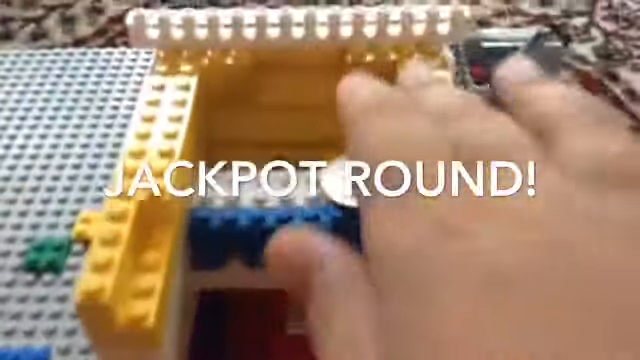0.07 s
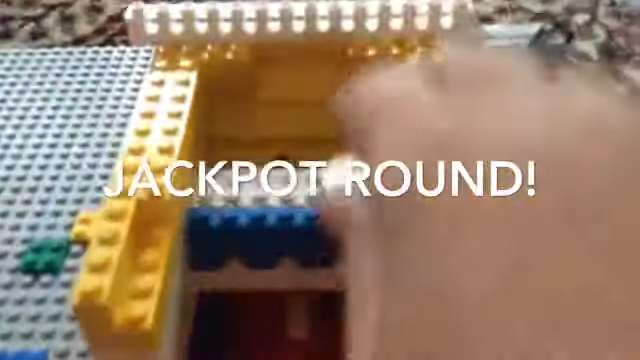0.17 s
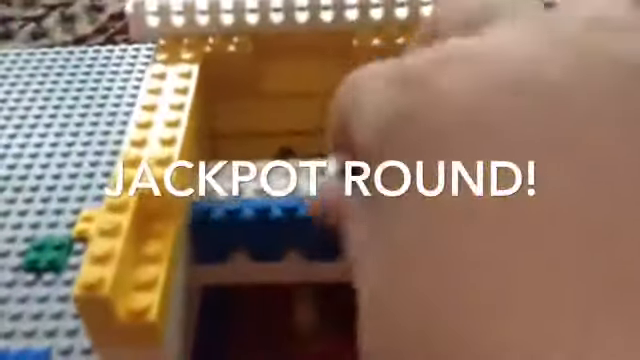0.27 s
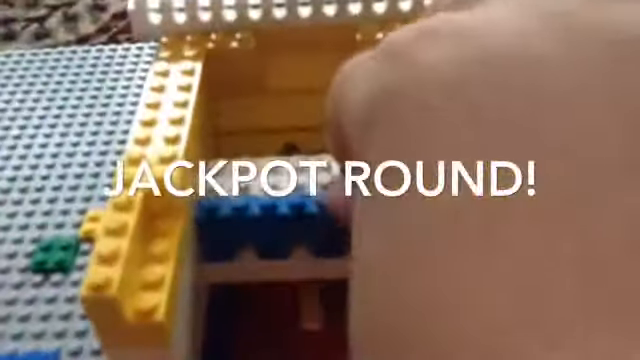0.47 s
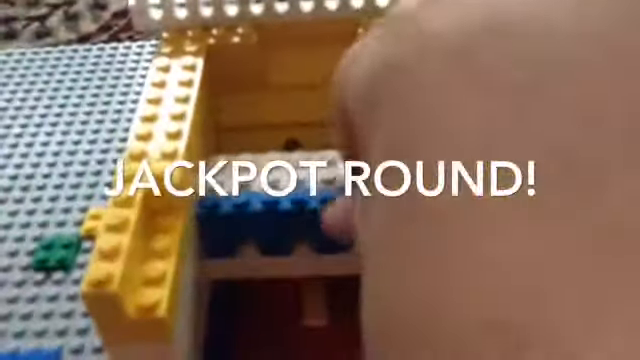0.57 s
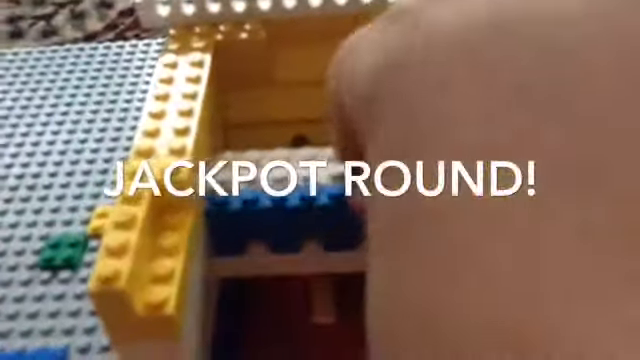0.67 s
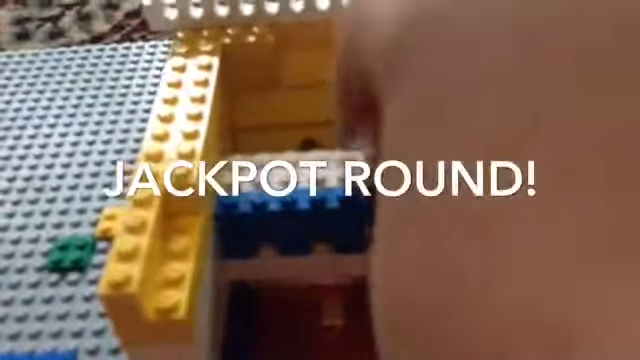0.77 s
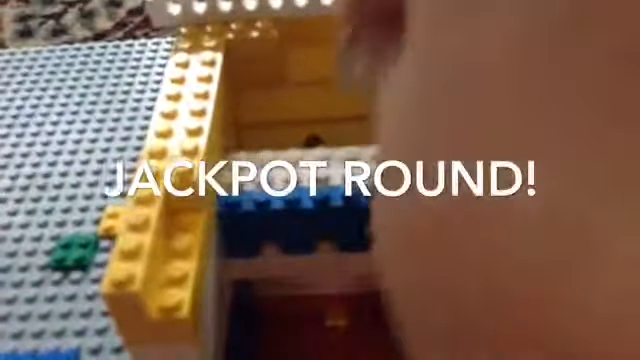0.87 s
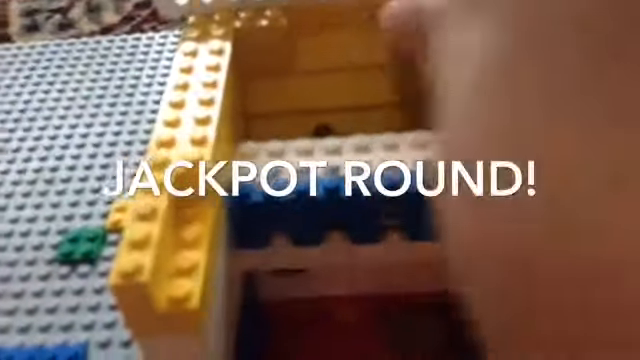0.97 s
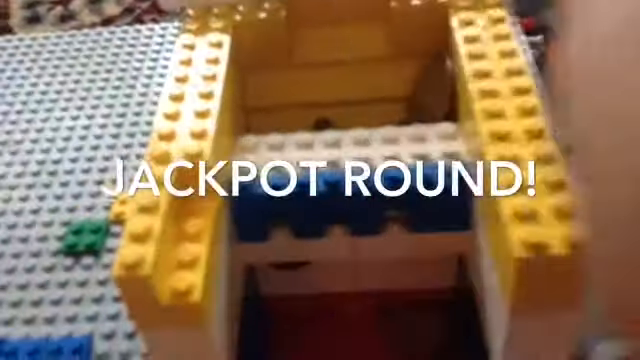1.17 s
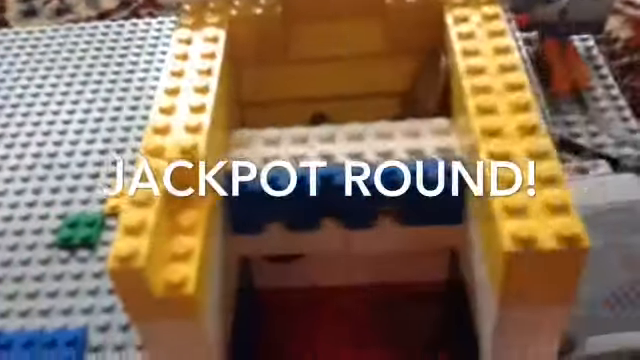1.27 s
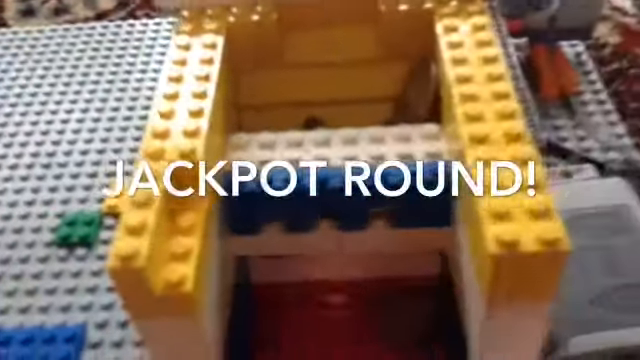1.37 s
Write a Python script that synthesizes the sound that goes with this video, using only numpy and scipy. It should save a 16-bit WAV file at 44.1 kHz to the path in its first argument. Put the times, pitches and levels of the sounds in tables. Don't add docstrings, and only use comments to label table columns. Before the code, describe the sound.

Coins clatter in a hollow plastic brick toy. Faint motor whine, gear chatter and hiss run throughout. At about 0.24 s a coin lands with a hard clack and very high ring, rattling in shrinking bounces until 0.52. Soft hollow knocks come from 0.57 to 1.0, strongest near 0.66 and 0.77. At 1.06 a second coin clacks with a low thump, bounces until 1.15 and ticks at 1.21. Close, dry room.

```python
import sys
import numpy as np
from scipy import signal
from scipy.io import wavfile
from scipy.ndimage import uniform_filter1d

SR = 44100
rng = np.random.default_rng(int(sys.argv[2]) if len(sys.argv) > 2 else 0)


def makeup_ratio(level_db):
    decades = np.asarray(level_db, float) / 20
    return 10 ** decades


def wav_record(signal):
    frames = np.transpose(np.atleast_2d(signal))
    bounded = np.clip(frames, -1, 1)
    quanta = np.round(bounded * 32767).astype(np.int16)
    wavfile.write(sys.argv[1], SR, quanta)


N = 61739
BAND_EDGE_HZ = 15300

# (frequency [Hz], level [dB])
TRAY_WALLS = [(1500, 0), (2100, 2.5), (2900, -2.5), (3750, -6), (4550, -1), (5150, -11.5), (5900, -7),
              (7200, -21)]
# (frequency [Hz], level [dB])
FIRST_RIM = [(7500, -1), (8600, 1.5), (9500, -0.5), (11500, -6), (12700, 0), (14000, -10), (14800, -2.5),
             (15600, -15)]


def evened(x):
    return x / np.sqrt(np.mean(x ** 2) + 1e-20)


def add(mix, start_s, sound):
    part = mix[round(start_s * SR):][:len(sound)]
    part += sound[:len(part)]


def ring(x, hz, width_hz):
    r = np.exp(-np.pi * width_hz / SR)
    feedback = [1, -2 * r * np.cos(2 * np.pi * hz / SR), r * r]
    return signal.lfilter([(1 - r * r) / 2, 0, (r * r - 1) / 2], feedback, x)


def struck(modes, detune, rise_s, size, spread=0.23):
    t = np.arange(size) / SR
    out = np.zeros(size)
    for hz, db, t60 in modes:
        pitch, phase = rng.random(2)
        turns = hz * (1 + detune * (2 * pitch - 1)) * t + spread * phase
        out += makeup_ratio(db - 60 * t / abs(t60)) * np.sin(2 * np.pi * turns)
    out = out * (1 - np.exp(-t / rise_s))
    return out / abs(out).max()


def many(outline, t60, spot_hz):
    f, db = np.transpose(outline)
    draw = rng.random((40, 3))
    hz = f[0] + (f[-1] - f[0]) * (np.arange(40) + draw[:, 0]) / 40
    level = np.interp(hz, f, db) + 8.5 * np.exp(-((hz - spot_hz) / (0.046 * hz)) ** 2)
    ring_s = t60 * makeup_ratio(0.13 * (level - level.max()) + 2.0) * (0.65 + 0.26 * draw[:, 2])
    return np.transpose([hz, level - 4 * draw[:, 1], ring_s])


def contacts(touches, walls, rim, box, box_rise_s):
    wall_t60, rim_t60, rise_s = 0.014, 0.013, 0.00053
    out = np.zeros(N)
    for s, wall_db, box_db, tick_db, spot_hz in touches:
        wall_modes = many(walls, wall_t60 * max(1 + 0.01 * wall_db, .4), spot_hz)
        tilt_db_per_octave = 0.28 * (tick_db - wall_db + 18.5)
        wall_modes[:, 1] += tilt_db_per_octave * np.log2(wall_modes[:, 0] / 3000)
        clack = makeup_ratio(wall_db) * struck(wall_modes, 0, rise_s, size=2500)
        knock = makeup_ratio(box_db) * struck(box, 0.031, box_rise_s, size=2500)
        tick = makeup_ratio(tick_db) * struck(many(rim, rim_t60, spot_hz), 0, rise_s, size=2500)
        add(out, s, clack + knock + tick)
    return signal.sosfilt(signal.butter(3, 480, "high", fs=SR, output="sos"), out)


def room(x):
    level_db, t60 = -19, 0.025
    t = np.arange(8000) / SR
    dull_noise = signal.lfilter([1], [1, -.5], rng.standard_normal(len(t)))
    tail = dull_noise * makeup_ratio(-60 * t / t60) * (t > .003)
    return makeup_ratio(level_db) * signal.fftconvolve(x, tail / np.linalg.norm(tail))[:N]


def patchy_hiss():
    # (frequency [Hz], density [dB per Hz])
    hiss_colour = [(60, -65), (130, -19), (220, -12.5), (450, -13.5), (800, -7), (3000, -5), (8000, -13),
                   (15000, -10.5)]
    frames, bins = N // 128 + 6, np.fft.rfftfreq(512, 1 / SR)
    real, imag, patches = rng.standard_normal((3, 257, frames))
    patches = uniform_filter1d(patches, size=6, axis=1)
    patches = evened(uniform_filter1d(patches, size=16, axis=0))
    f, db = np.transpose(hiss_colour)
    colour_db = np.interp(np.log(bins + 1), np.log(f + 1), db)[:, None]
    patch_db = 3 * patches * np.clip(bins / 900, .3, 1)[:, None]
    spectrum = (real + 1j * imag) * makeup_ratio(colour_db + patch_db)
    return evened(signal.istft(spectrum, nperseg=512, noverlap=384)[1][:N])


def gear_chatter():
    # (frequency [Hz], width [Hz], level [dB])
    casing = [(1143, 156, -3), (2200, 310, -9.5), (2830, 190, -24), (3980, 490, -7.5), (6900, 600, -8),
              (9900, 320, -8), (12900, 340, -17)]
    teeth_per_s, spread_db, whir = 930, 3.5, 0.41
    chance, force, side = rng.random((3, N))
    taps = (chance < teeth_per_s / SR) * makeup_ratio(-spread_db * np.log(force + 0.0035)) * np.sign(side - .5)
    teeth = evened(taps) + whir * rng.standard_normal(N)
    out = np.zeros(N)
    for hz, width_hz, db in casing:
        out += makeup_ratio(db) * evened(ring(ring(teeth, hz, width_hz), hz, 2 * width_hz))
    return evened(out)


def motor_whine(level_db):
    # (time [s], whine pitch [Hz])
    motor_speed = [(0.0, 853.6), (0.07, 828.1), (0.206, 852.5), (0.244, 799.5), (0.31, 847.3),
                   (0.346, 799.3), (0.376, 846.6), (0.45, 826.6), (0.498, 860.5), (0.716, 833.5),
                   (0.762, 810.2), (0.868, 834.3), (0.96, 810.6), (1.062, 864.5), (1.078, 837.4),
                   (1.222, 857.5), (1.28, 831.2), (1.4, 853.8)]
    waver_hz, flutter_db, octave_db = 5.3, 2.5, -19
    slow_noise = uniform_filter1d(rng.standard_normal(N), size=500)
    waver = evened(uniform_filter1d(slow_noise, size=500))
    hz = np.interp(np.arange(N) / SR, *np.transpose(motor_speed)) + waver_hz * waver
    turn = 2 * np.pi * np.cumsum(hz) / SR
    flutter = flutter_db * np.roll(waver, N // 3)
    return makeup_ratio(level_db + 5.5 + flutter) * (np.sin(turn) + makeup_ratio(octave_db) * np.sin(2 * turn))


def machine():
    # (time [s], whine level [dB], gear and hiss level [dB])
    motor_load = [
        (0, -46.5, -35),
        (.2, -46, -35),
        (.42, -51, -34.5),
        (.55, -50, -37.5),
        (.7, -47, -38),
        (1.0, -47.5, -37.5),
        (1.2, -50.5, -39),
        (1.27, -51.5, -39.5),
        (1.4, -50.5, -36.5),
    ]
    s, whine_db, load_db = np.transpose(motor_load)
    t = np.arange(N) / SR
    hiss = patchy_hiss()
    hum = signal.sosfiltfilt(signal.butter(2, 600, fs=SR, output="sos"), hiss)
    running_noise = makeup_ratio(-6) * gear_chatter() + hiss - hum
    whine = motor_whine(np.interp(t, s, whine_db))
    out = whine + makeup_ratio(-36.5) * hum + makeup_ratio(np.interp(t, s, load_db)) * running_noise
    return signal.oaconvolve(out, signal.firwin(511, BAND_EDGE_HZ - 100, fs=SR), "same")


def pusher():
    # (time [s], brick walls [dB], hollow box [dB], rim tick [dB], favoured wall pitch [Hz])
    knocks = [(.570, -37, -32, -38, 3000), (.637, -52, -31, -43, 2200), (.642, -54, -23, -36, 2200),
              (.659, -18.5, -23, -30, 2200), (.703, -50, -27.5, -48, 3000), (.768, -15.5, -21, -22, 3680),
              (.810, -37, -27.5, -36, 2400), (.817, -49, -28.5, -42, 2500), (.950, -27.5, -26, -35, 2200),
              (.972, -38, -32.5, -47, 2400), (1.000, -28.5, -30, -54, 2400)]
    # (frequency [Hz], level [dB], t60 [s])
    push_box = [(1030, 0.5, 0.028), (1179, 2, 0.04), (1275, -6.5, 0.042)]
    return contacts(knocks, TRAY_WALLS, FIRST_RIM, push_box, 0.0012)


def thumps():
    # (time [s], frequency [Hz], level [dB])
    jolts = [
        (0.2418, 196, -25),
        (1.062, 240, -21),
        (1.149, 270, -28.5),
        (1.262, 255, -37.5),
    ]
    out, t = np.zeros(N), np.arange(4000) / SR
    for s, hz, db in jolts:
        decay = makeup_ratio(db - 60 * t / 0.025)
        add(out, s, decay * np.sin(2 * np.pi * hz * t) * np.minimum(t / 0.0047, 1))
    return out


def flights():
    # (start [s], length [s], frequency [Hz], level [dB], t60 [s], negative swells)
    songs = [
        (.285, .048, 12862, -31, .5),
        (.346, .061, 12762, -34.5, -.8),
        (.438, .034, 12768, -42, .5),
        (1.076, .101, 9452, -41.5, 8.0),
        (1.213, .06, 9420, -49, .6),
    ]
    out = np.zeros(N)
    for s, length, hz, db, t60 in songs:
        t = np.arange(0, length, 1 / SR)
        fade = np.clip(np.minimum(t / .003, (length - t) / .004), 0, 1)
        wobble = makeup_ratio(1.2 * np.sin(2 * np.pi * 31 * t))
        add(out, s, fade * wobble * makeup_ratio(db + 2.0 - 60 * t / t60) * np.sin(2 * np.pi * hz * t))
    return out


def clinks():
    # (time [s], level [dB], favoured pitch [Hz])
    touches = [
        (0.2409, -11.5, 12900),
        (0.2462, -6.5, 12900),
        (0.253, -8, 12950),
        (0.255, -12, 13000),
        (0.2603, -8, 13300),
        (0.2647, -16, 12100),
        (0.2691, -8, 12630),
        (0.273, -19, 12300),
        (0.281, -17, 12400),
        (0.298, -30, 13000),
    ]
    # (frequency [Hz], level [dB], t60 [s])
    coin_modes = [(12630, 0, .08), (12705, -4, .05), (12765, 0, .07), (12873, -3, .05), (12988, -3, .05),
                  (13220, -9, .06), (13380, -11, .04), (13680, -10, .05), (13845, -14, .08),
                  (13980, -14, .03), (14450, -16, .08), (15150, -12, .05), (11900, -14, .04)]
    out = np.zeros(N)
    for s, db, spot_hz in touches:
        modes = np.array(coin_modes, float)
        modes[:, 1] += 6 * np.exp(-((modes[:, 0] - spot_hz) / 120) ** 2)
        add(out, s, makeup_ratio(db) * struck(modes, 0.00021, 0.000057, size=6000, spread=1))
    return out


def coin_contacts():
    # (time [s], brick walls [dB], hollow box [dB], rim tick [dB], favoured wall or rim pitch [Hz])
    first_coin = [(.2412, -1, -7, -14, 2980), (.2475, -17, -25, -22, 4700), (.252, -10, -15.5, -23, 3870),
                  (.2585, -7.5, -48, -16, 3150), (.2605, -10, -11.5, -20, 6800),
                  (.267, -19, -41, -20, 3230), (.270, -11, -37, -17.5, 3210), (.281, -15, -25, -27, 2900),
                  (.292, -20, -31, -35, 4620), (.2975, -17.5, -24.5, -26, 3430),
                  (.3015, -28, -51, -47, 3370), (.316, -18, -31, -39, 6400), (.3262, -20, -24.5, -35, 6400),
                  (.3278, -21, -20.5, -41, 2920), (.3366, -7, -24, -14, 3000),
                  (.3447, -9.5, -21, -10, 8460), (.3497, -20.5, -22, -36, 3200),
                  (.369, -50, -27.5, -56, 2820), (.386, -21.5, -47, -45, 3370),
                  (.421, -31, -21.5, -40, 3020), (.4343, -17.5, -19, -19.5, 8100),
                  (.4722, -20, -19.5, -24.5, 2980), (.4832, -15, -28, -39, 6860),
                  (.488, -24, -17, -29, 3980), (.4962, -12, -12.5, -17, 2400), (.4988, -16, -19, -24, 7130),
                  (.5165, -22.5, -30, -35, 5100)]
    # (time [s], brick walls [dB], hollow box [dB], rim tick [dB], favoured wall pitch [Hz])
    second_coin = [(1.0627, -4, -12, -4, 2004), (1.0665, -26, -24, -9.5, 4460),
                   (1.0737, -15, -20.5, -31, 3250), (1.078, -40, -28, -36, 2000),
                   (1.108, -18.5, -21, -40, 2740), (1.1125, -15.5, -19, -45, 2880),
                   (1.1155, -16, -39, -45, 1790), (1.1335, -25, -35, -40, 3500),
                   (1.137, -24, -27, -36, 2340), (1.144, -19, -23.5, -26, 4170),
                   (1.151, -14, -22.5, -20, 4660), (1.210, -18.5, -26, -28, 5470)]
    # (frequency [Hz], level [dB])
    upper_walls = [(1500, -5), (1950, 3.5), (2350, -6.5), (3130, 2.5), (4000, -5), (5300, -2), (6600, -3),
                   (7500, -12.5)]
    # (frequency [Hz], level [dB])
    second_rim = [(7400, -19), (8060, -0.5), (8600, -6), (9300, 2.5), (10400, -7), (11000, -6), (13000, -1),
                  (15300, -8)]
    # (frequency [Hz], level [dB], t60 [s])
    hollow_box = [(1340, 5, 0.015), (1122, 7.5, 0.0086), (1240, 4, 0.016), (605, -7, 0.037)]
    first = contacts(first_coin, upper_walls, FIRST_RIM, hollow_box, 0.00048)
    return first + contacts(second_coin, TRAY_WALLS, second_rim, hollow_box, 0.00048)


def scene():
    hits = pusher() + thumps() + flights() + clinks() + coin_contacts()
    return (machine() + hits + room(hits))[None]


def top_cut(x):
    return signal.sosfilt(signal.butter(12, 16470, fs=SR, output="sos"), x)


def record(dry):
    x = signal.sosfilt(signal.butter(5, 120, "high", fs=SR, output="sos"), dry)
    shelf = makeup_ratio(-26)
    main_band = signal.firwin(511, BAND_EDGE_HZ, window=("kaiser", 9), fs=SR)
    shelf_band = signal.firwin(511, 15900, window=("kaiser", 9), fs=SR)
    band_limit = (1 - shelf) * main_band + shelf * shelf_band
    x = signal.oaconvolve(x, band_limit[None], "same")
    return top_cut(np.clip(x, -1, 1))


dry = scene()
out = record(dry)
wav_record(out)
```